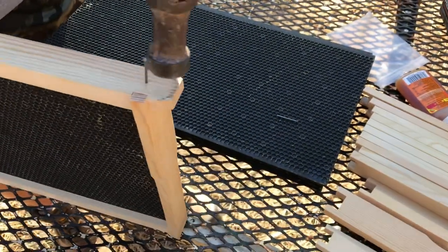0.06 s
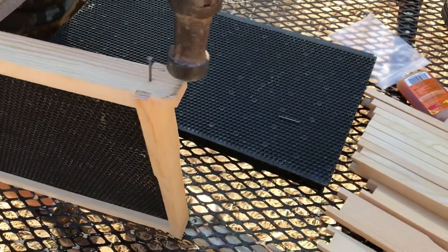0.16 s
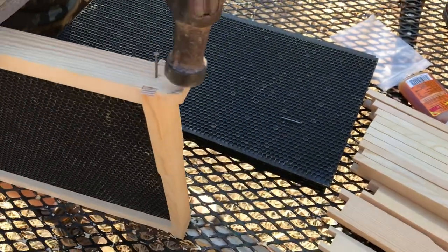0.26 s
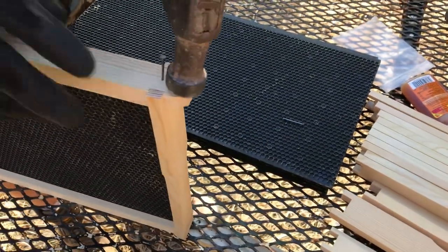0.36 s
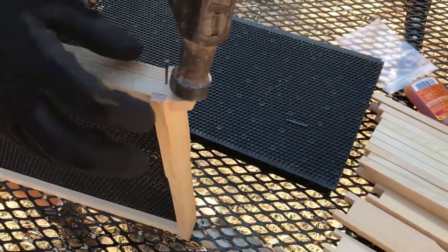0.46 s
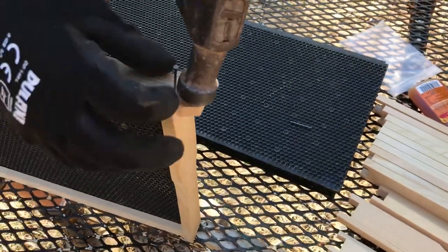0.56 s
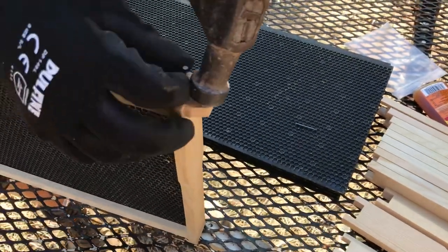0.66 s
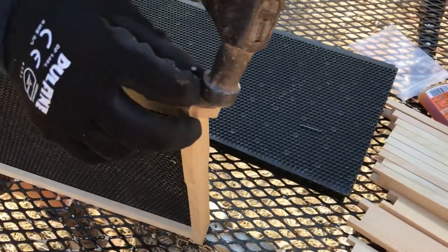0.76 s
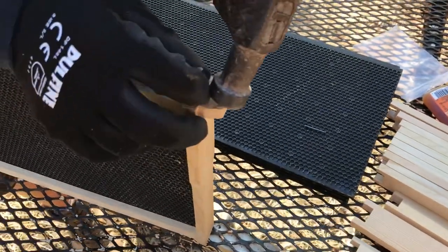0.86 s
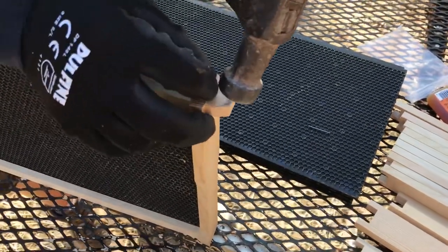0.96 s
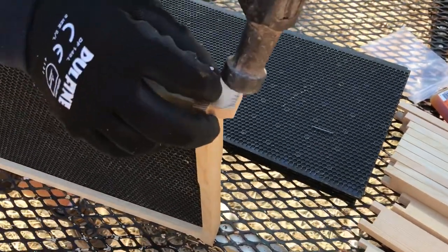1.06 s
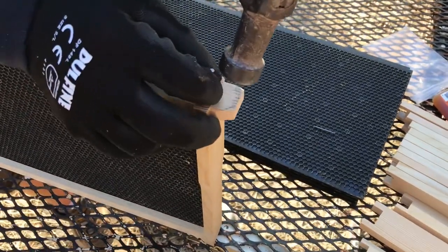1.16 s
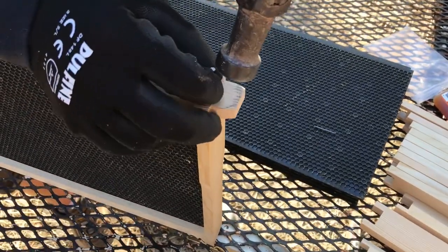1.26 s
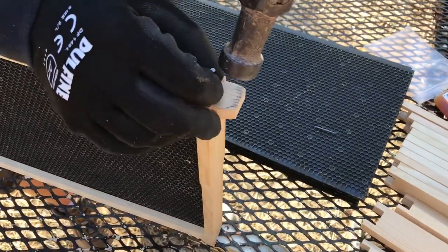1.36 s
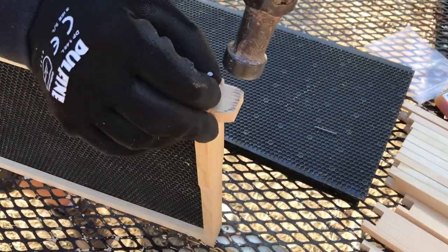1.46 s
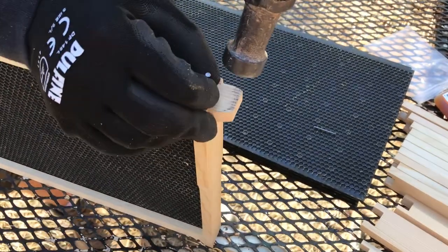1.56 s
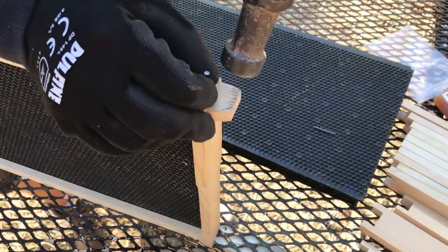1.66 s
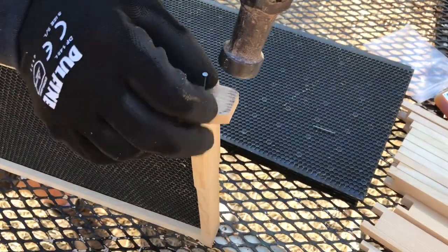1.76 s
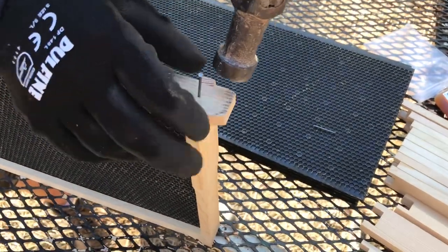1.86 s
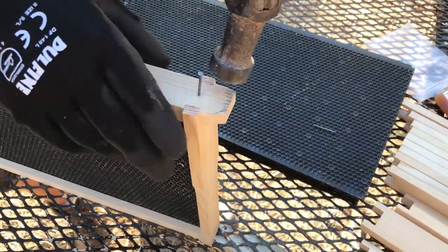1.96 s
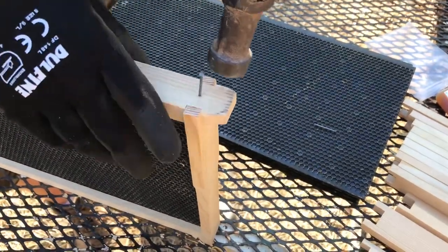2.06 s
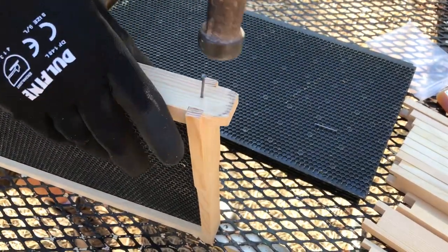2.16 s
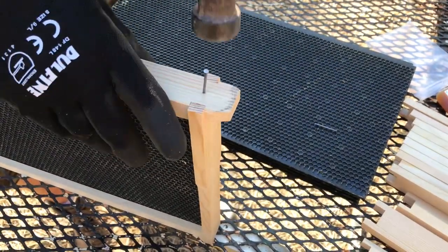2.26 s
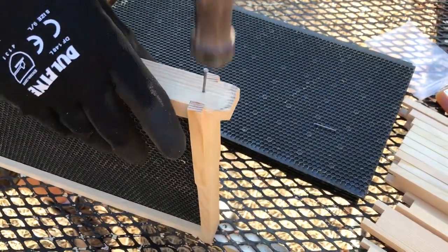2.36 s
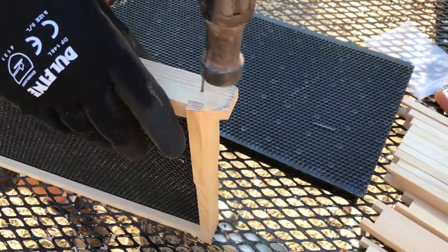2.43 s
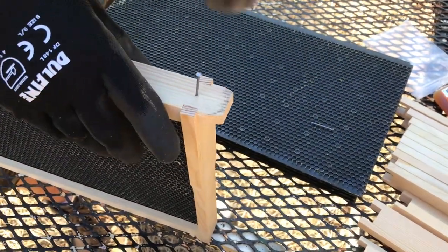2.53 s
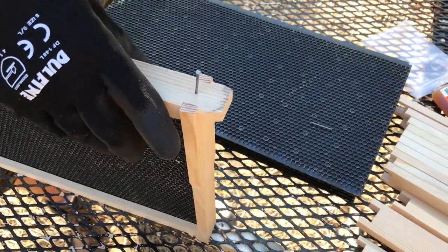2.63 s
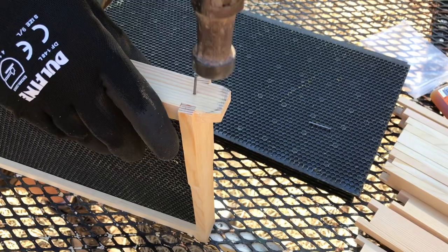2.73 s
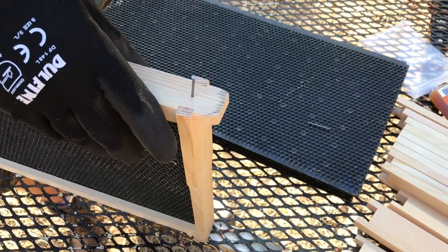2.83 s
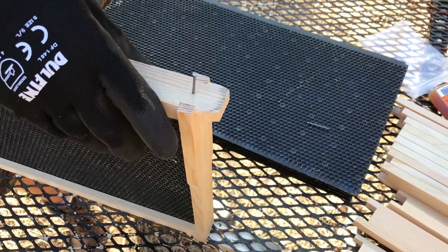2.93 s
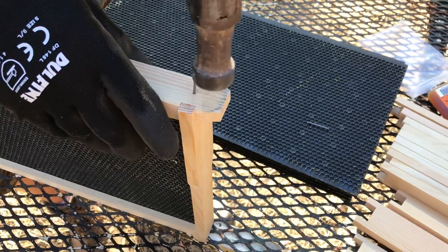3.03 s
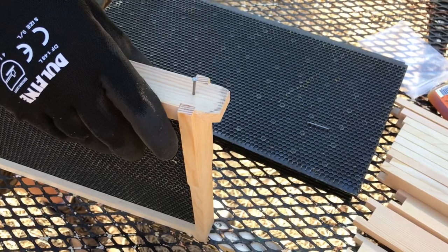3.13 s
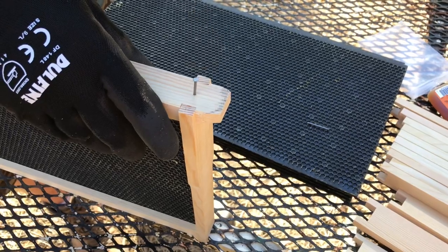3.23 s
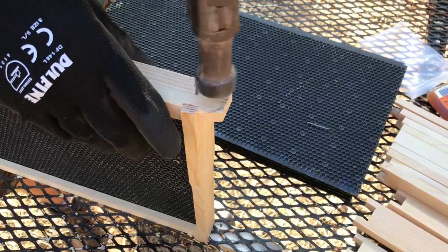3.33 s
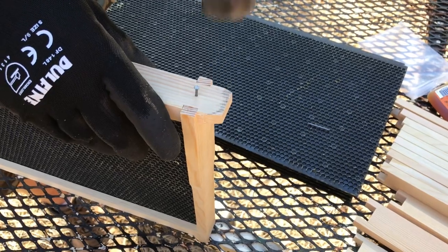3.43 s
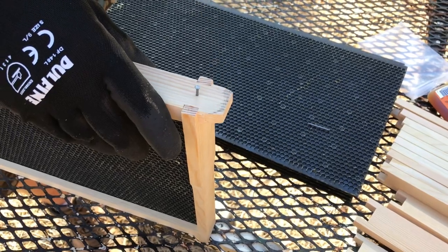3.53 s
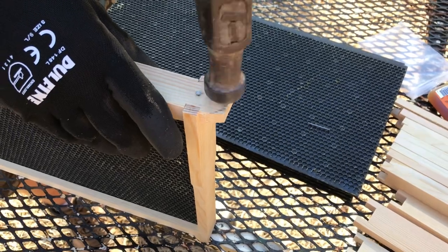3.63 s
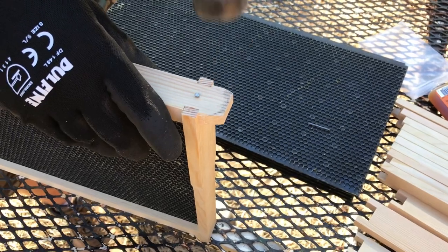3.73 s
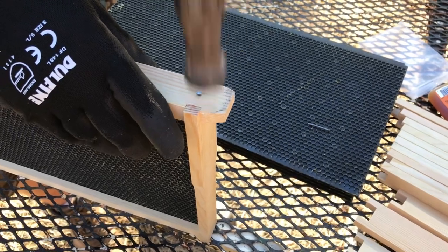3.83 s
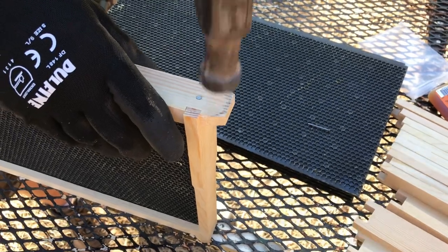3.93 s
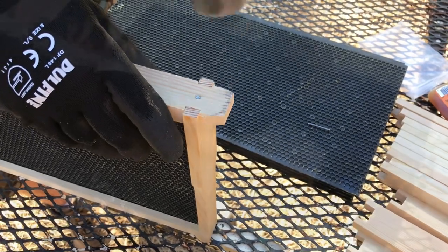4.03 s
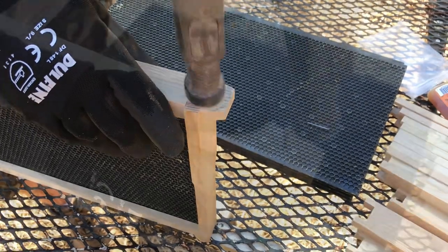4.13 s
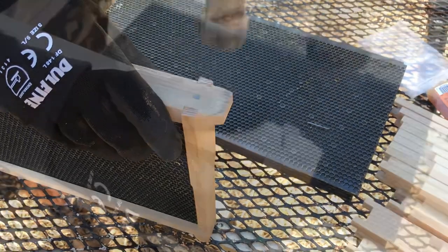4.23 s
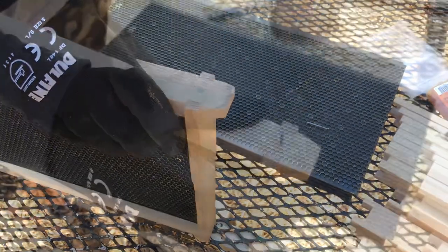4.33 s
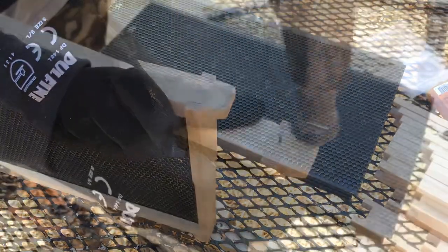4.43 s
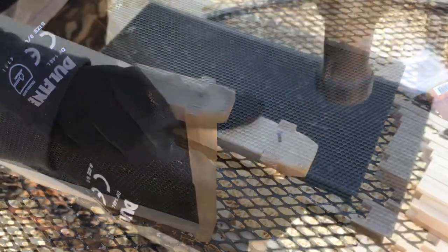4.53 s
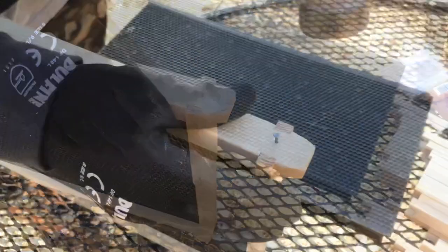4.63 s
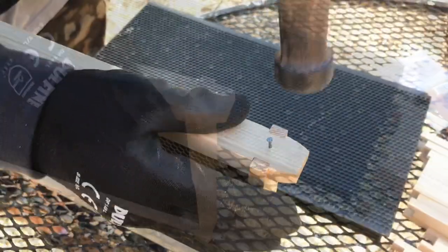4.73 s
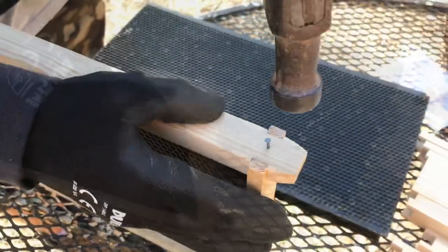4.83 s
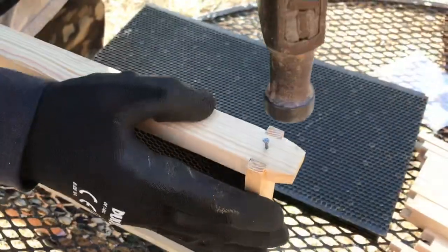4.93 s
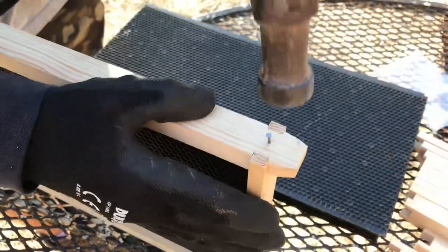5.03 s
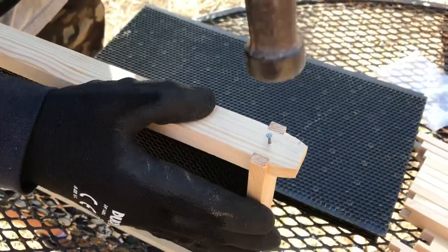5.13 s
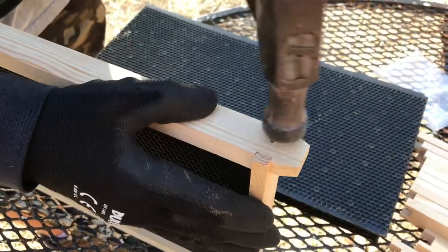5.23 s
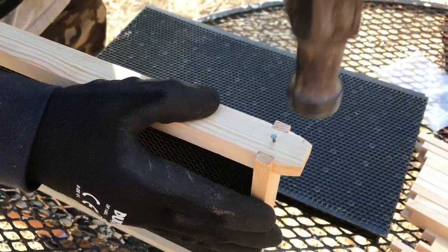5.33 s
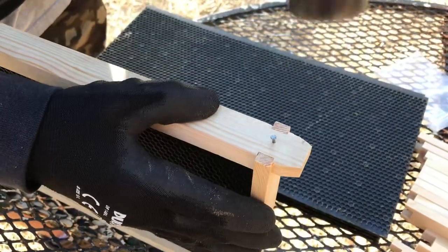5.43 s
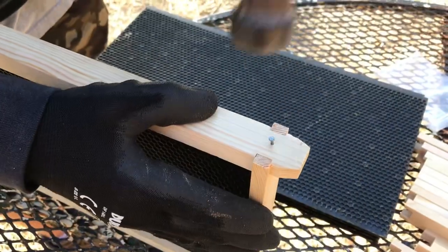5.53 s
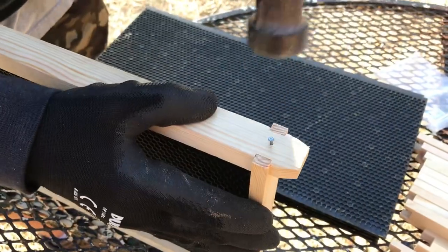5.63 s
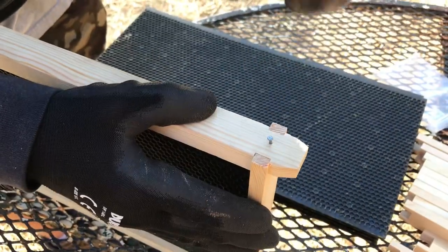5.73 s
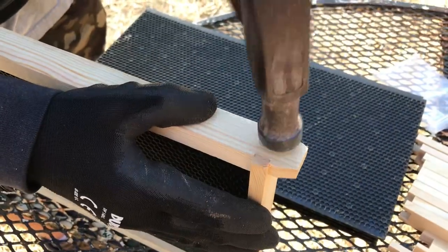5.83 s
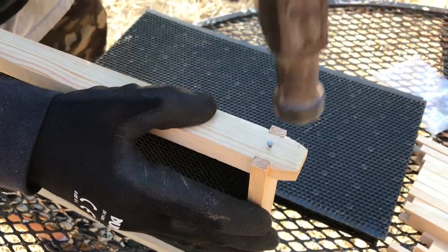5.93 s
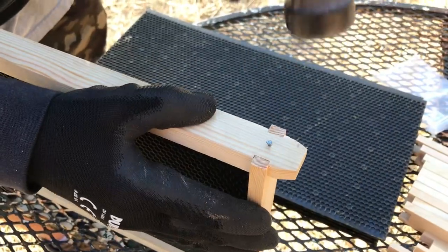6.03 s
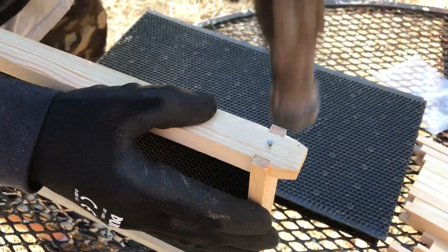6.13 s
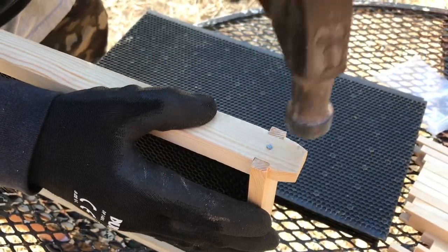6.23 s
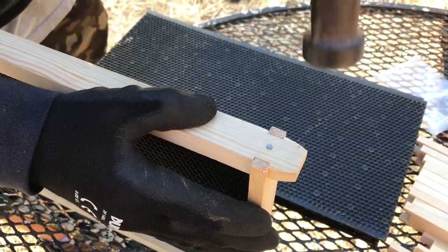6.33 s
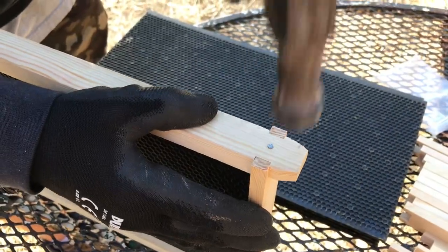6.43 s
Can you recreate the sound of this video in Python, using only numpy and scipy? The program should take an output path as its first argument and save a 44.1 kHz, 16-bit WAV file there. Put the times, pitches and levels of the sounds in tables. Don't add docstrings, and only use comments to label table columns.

```python
import sys
import numpy as np
from scipy import signal
from scipy.fft import rfft, irfft, next_fast_len
from scipy.io import wavfile
from scipy.ndimage import uniform_filter1d

SR = 44100
rng = np.random.default_rng(int(sys.argv[2]) if len(sys.argv) > 2 else 0)


def elevation(decibels):
    levels = np.asarray(decibels, float)
    return 10 ** (levels / 20)


def generate_wav(sig):
    pcm = np.round(np.clip(np.atleast_2d(sig).T, -1, 1) * 32767).astype(np.int16)
    wavfile.write(sys.argv[1], SR, pcm)


N = 285768
TURNED_S = 4.4


def noise(count):
    return rng.standard_normal(count)


def evened(x):
    return x / np.sqrt(np.mean(x ** 2) + 1e-20)


def add(mix, s, sound):
    part = mix[max(round(s * SR), 0):][:len(sound)]
    part += sound[:len(part)]


def coloured(x, points):
    size = next_fast_len(len(x))
    f, db = np.transpose(points)
    bins = np.log(np.fft.rfftfreq(size, 1 / SR) + 1)
    gain = elevation(np.interp(bins, np.log(f + 1), db))
    return irfft(rfft(x, size) * gain, size)[:len(x)]


def resonate(x, hz, width):
    return signal.lfilter(*signal.iirpeak(min(hz, .45 * SR), max(hz / width, .3), SR), x)


def low_part(x, hz):
    return signal.sosfilt(signal.butter(2, hz, fs=SR, output="sos"), x)


def wander(count, *sizes):
    x = noise(count)
    for size in sizes:
        x = uniform_filter1d(x, size)
    return evened(x)


def drift(per_s):
    return wander(N, int(SR / per_s), int(SR / per_s))


def ring(modes, t, widen=1):
    sound = np.zeros(len(t))
    for hz, width, db in modes:
        level_off, pitch_off, phase = rng.standard_normal(3)
        decay = np.exp(-np.pi * width * widen * t)
        swing = np.sin(2 * np.pi * hz * (1 + .012 * pitch_off) * t + phase)
        sound += elevation(db + 2 * level_off) * decay * swing
    return sound


def contact(db, hz, sharp):
    # f/Hz, level/dB per Hz
    scratch_colour = [(300, -22), (1500, -9), (3500, 0), (6000, -5), (10000, -13), (15000, -21),
                      (17000, -30)]
    t = np.arange(900) / SR
    sharp = np.clip(sharp, 0, 1)
    rise = t * hz / 2.0
    cycles = np.sin(2 * np.pi * hz * t) * rise * np.exp(1 - rise)
    burst = (t / .0022) ** 2 * np.exp(2 - 2 * t / .0022)
    scratch = evened(coloured(noise(len(t)), scratch_colour)) * burst
    return elevation(db + 3) * ((1 - sharp) * cycles + sharp * scratch)


def yard():
    # f/Hz, level/dB per Hz
    traffic = [(15, -35.5), (36, -2.5), (106, -4.5), (188, -14.5), (267, -15.5), (324, -19), (558, -22.5),
               (1020, -23), (1200, -22), (1660, -29), (3020, -33.5), (3460, -36), (10300, -44.5),
               (14300, -41), (16800, -49.5)]
    # f/Hz, width/Hz, level/dB
    whines = [
        (12940, 60, -82),
        (14400, 250, -79),
    ]
    sound = elevation(-54 + .6 * drift(2.0)) * evened(coloured(noise(N), traffic))
    for hz, width, db in whines:
        sound += elevation(db) * evened(resonate(noise(N), hz, width))
    return sound


def idling_motor():
    # multiple of the turning rate, level/dB
    idle_orders = [(2, -59), (3, -72.5), (4, -56), (5, -67.5), (6, -60), (7, -76), (8, -73)]
    idle_hz = 22.5
    turn = 2 * np.pi * np.cumsum(idle_hz * (1 + 0.03 * drift(3.3))) / SR
    return np.sqrt(2) * sum(elevation(db + 6.0 * drift(16)) * np.cos(k * turn) for k, db in idle_orders)


def rub(start, length, db, fizz_db, body_db):
    # f/Hz, width/Hz
    rub_bands = [
        (4260, 5700),
        (9300, 12500),
        (1700, 3060),
    ]
    t = np.arange(start, start + length, 1 / SR)
    slips = noise(len(t)) * elevation(2.2 * rng.exponential(1, len(t)))
    rasp, fizz, body = (evened(resonate(resonate(slips, *b), *b)) for b in rub_bands)
    pressure_db = np.interp((t - start) / length, [0, .29, .73, 1], [-3.5, 0, -4.5, -14])
    grip_db = 1.3 * wander(len(t), 500)
    sound = rasp + elevation(fizz_db) * fizz + elevation(body_db) * body
    return elevation(db + pressure_db + grip_db) * sound * signal.windows.tukey(len(t), .15)


def rubs(work):
    # start t/s, length t/s, level/dB, fizz level/dB, body level/dB
    strokes = [(0, 0.078, -65.5, 1, 14), (0.051, 0.22, -59, -3.5, 5.5), (0.37, 0.023, -56.5, -4, 4.5),
               (0.387, .06, -70, -9, 1), (0.452, 0.2, -70.5, 2, -2), (.63, 0.09, -62, -5, -1),
               (0.704, 0.22, -65, -4, -3), (1.774, .05, -56, -2, -16), (1.806, .07, -64, 1, -13),
               (1.853, 0.13, -62.5, 3, 7), (1.939, 0.17, -58.5, -2, -1), (2.105, .05, -65, -8, -4),
               (4.782, 0.2, -58.5, 7.5, -11), (5.0, 0.17, -65.5, -3, -2), (5.406, 0.094, -62.5, -3, -18),
               (5.497, 0.069, -66, 9, -9), (5.538, 0.063, -58, 1.5, -15)]
    for start, *settings in strokes:
        add(work, start, rub(start, *settings))


def rub_sing():
    size = int(.27 * SR)
    song = evened(resonate(noise(size), 4250, 220))
    return elevation(-60) * song * signal.windows.tukey(size, .4)


def bump(db, modes):
    t = np.arange(SR // 8) / SR
    grit = .7 * low_part(noise(len(t)), 2000) * np.exp(-t / .02)
    return elevation(db) * (ring(modes, t) + grit) * (1 - np.exp(-t / 0.00037))


def bumps(work):
    bump_s = [0, .3715, .386, .755, .404]
    bump_db = [-37, -32, -35.5, -42, -42.5]
    # f/Hz, width/Hz, level/dB
    bump_modes = [
        [(1656, 73, 3), (1880, 24, -2)],
        [(197, 57, -1), (340, 75, -3), (590, 26, -4), (890, 55, -9), (1480, 100, -6), (2240, 81, -19),
         (3200, 57, -15)],
        [(354, 25, -6), (590, 36, -4.5), (753, 35, -0.5), (1400, 99, -2), (1600, 49, -6)],
        [(470, 74, 2)],
        [(340, 36, 7.5), (636, 20, -1), (1000, 38, -1)],
    ]
    for s, db, modes in zip(bump_s, bump_db, bump_modes):
        add(work, s, bump(db, modes))


def touches(work):
    # t/s, peak level/dB, ring f/Hz, sharp share 0-1
    light_touches = [(0.6392, -60, 4450, 0.4), (0.6967, -50.5, 2060, 0.36), (0.8093, -55, 1850, 0.55),
                     (1.19, -58, 1520, 0.34), (1.5316, -42, 9400, 0.23), (1.5557, -35.5, 9600, 0.1),
                     (1.5794, -69, 1520, 1), (1.7833, -49, 3760, 0), (1.953, -44.5, 2060, 0.5),
                     (2.081, -50, 4260, 0.43), (3.5655, -48, 1720, 0.15), (4.6392, -63, 1600, 0.7),
                     (4.9597, -61.5, 1700, 0.55), (5.1388, -62, 1500, 0.66), (5.4124, -59, 5000, 0.7),
                     (5.5041, -61, 1540, 0.77), (5.5326, -45, 7320, 0.2), (5.5494, -44, 3610, 0.4),
                     (5.5762, -41.5, 8270, 0.33), (5.7185, -48.5, 5020, 0.4)]
    for s, *settings in light_touches:
        add(work, s, contact(*settings))


def far_engine():
    # t/s, firing f/Hz, level/dB
    revs = [
        (1.55, 69.3, -60),
        (1.811, 87.3, -46.5),
        (2.0, 96.4, -44),
        (2.599, 97, -40),
        (3.03, 105.3, -41),
        (3.12, 110.1, -45),
        (3.4, 113.9, -47.5),
        (4.402, 114.5, -56),
        (4.85, 119.7, -69),
    ]
    # multiple of the firing rate, level/dB
    engine_orders = [(.5, -19.5), (1, 3.5), (1.5, -13), (2, -18.5)]
    t = np.arange(N) / SR
    s, hz, db = np.transpose(revs)
    turn = 2 * np.pi * np.cumsum(np.interp(t, s, hz) * (1 + 0.0015 * drift(6))) / SR
    level_db = np.interp(t, s, db, left=-120, right=-120) + 2.0 * drift(26)
    return np.sqrt(2) * sum(elevation(level_db + d) * np.cos(k * turn) for k, d in engine_orders)


def steel_tick(t):
    # f/Hz, width/Hz, level/dB
    hammer_face = [(6950, 750, -2.5), (9700, 8700, -9), (13200, 3800, -13), (4130, 1200, -16.5)]
    # f/Hz, t60 t/s, level/dB under the tick
    head_ring = [(5665, .45, -63), (5700, .3, -66)]
    tick = ring(hammer_face, t) + .5 * noise(len(t)) * np.exp(-t / .0011)
    tick = tick / abs(tick).max()
    return tick + sum(elevation(db - 60 * t / t60) * np.sin(2 * np.pi * hz * t) for hz, t60, db in head_ring)


def wood_knock(t, wood):
    # f/Hz, width/Hz, level/dB
    thump = [(738, 110, -1), (1330, 620, -4)]
    knock = ring(wood, t, widen=3.0) + 1.8 * ring(thump, t)
    knock = knock * (1 - np.exp(-(t / 0.003) ** 2))
    return knock / np.std(knock[:400])


def mesh_chatter(t, wood, length, treble_db):
    # f/Hz, level/dB per Hz
    chatter_colour = [(35, -34), (60, 1.5), (366, -4), (464, -10), (586, -1), (1110, -2.5), (1650, -5.5),
                      (1810, -7), (2290, -6.5), (3580, -5.5), (4860, -9), (11000, -22), (15400, -32),
                      (16500, -34)]
    clump_db = np.minimum(1.5 + 25 * t, 3.5) * wander(len(t), 110, 70)
    grains = noise(len(t)) * elevation(0.35 * rng.exponential(1, len(t)))
    body = evened(coloured(grains, chatter_colour))
    woody = sum(elevation(db) * resonate(body, hz, 1.7 * width) for hz, width, db in wood)
    body = evened(body + 0.6 * woody)
    below = low_part(body, 2900)
    table = low_part(below, 720)
    age = t / max(length, .02)
    table_env = elevation(-32 * age) * (1 - np.exp(-t / .014))
    middle_env = elevation(-42 * age ** 1.295 + 0.77 * clump_db) * (1 - np.exp(-t / 0.004))
    treble_env = elevation(treble_db - 41.2 * (1.16 * age) ** 1.214 + clump_db) * (1 - np.exp(-t / 0.00047))
    chatter = table * table_env + (below - table) * middle_env + (body - below) * treble_env
    return chatter * signal.windows.tukey(2 * len(t), .2)[len(t):]


def blow(s, tick_db, knock_db, chatter_db, length):
    # f/Hz, width/Hz, level/dB
    frame_modes = [(348, 15, -5), (1140, 240, -8.5), (1390, 68, 2.5), (1550, 33, -1.5), (1818, 11, 3.5),
                   (2103, 4.2, -3), (2340, 39, -2), (3200, 31, -19), (3610, 150, -6), (4050, 45, -5)]
    # f/Hz, width/Hz, level/dB
    turned_modes = [(345, 110, -1.5), (930, 160, 1), (1050, 210, -4), (1500, 34, 2), (1604, 11, -7),
                    (1970, 19, -9.5), (2290, 30, -11.5), (3010, 47, -7), (3490, 51, -11), (4030, 45, -6),
                    (4220, 37, -2), (5230, 60, -21)]
    wood = frame_modes if s < TURNED_S else turned_modes
    t = np.arange(SR // 2) / SR
    sound = elevation(tick_db) * steel_tick(t) + elevation(knock_db - 7) * wood_knock(t, wood)
    treble_db = 5.5 + 0.4864 * knock_db
    add(sound, 0, elevation(chatter_db) * mesh_chatter(t[:SR // 4], wood, length, treble_db))
    return sound


def hops(work, s, chatter_db, count=3):
    for i in range(1, count + 1):
        age = .022 * (i + .15 * rng.uniform(-1, 1))
        add(work, s + age, contact(chatter_db - 9 - 210 * age, rng.uniform(2900, 4800), 1))


def hammering(work):
    # t/s, tick peak level/dB, knock level/dB, chatter level/dB, chatter length t/s
    blows = [(2.4294, 2.5, -16.5, -14, 0.15), (2.7280, 7.5, -15.5, -12.5, 0.14),
             (3.0230, 8, -15.5, -12, 0.14), (3.3294, 6, -20, -14, 0.15), (3.622, 7, -14, -14, .16),
             (3.8946, 2, -10.5, -8.5, 0.17), (4.1333, -15.5, -26.5, -23, .093),
             (4.1478, 0, -7.5, -10, 0.18), (4.4526, -1.5, -14.5, -20.5, .14), (5.2580, 6.5, -7, -14.5, .13),
             (5.8780, 5.5, -9, -15, .13), (6.2007, 5, -8.5, -14, .14)]
    rebounds = [-5.5, -4, -4, -11.5, -5.5, -2.5, -40, -25, -30, -7.5, -14, -9.5]
    for (s, tick_db, knock_db, chatter_db, length), rebound_db in zip(blows, rebounds):
        add(work, s, blow(s, tick_db, knock_db, chatter_db, length))
        rebound_hz = 3660 if s < TURNED_S else 4230
        add(work, s + .0088, contact(rebound_db, rebound_hz, .15))
        hops(work, s, chatter_db)


def bounces(work):
    # t/s, level/dB, ring f/Hz
    drops = [(2.4933, -29.5, 5370), (2.5298, -46, 2950), (2.7566, -9.5, 3610), (2.798, -32, 4570),
             (2.8185, -42, 2840), (2.8443, -44.5, 4050), (3.088, -39, 4350), (3.1382, -40.5, 4100),
             (3.3558, -16, 4220), (3.378, -26, 4430), (3.4447, -49.5, 3840), (3.655, -33, 3670),
             (3.6883, -24, 3010), (3.7409, -45.5, 2980), (3.9943, -27.5, 4000), (4.0207, -36.5, 4280),
             (4.0593, -63, 3790), (4.1741, -16, 3470), (4.2345, -26, 4820), (4.2748, -38, 5340),
             (4.3213, -52.5, 4570), (4.5202, -37.5, 3100), (4.556, -51.5, 3720), (5.2873, -12.5, 3130),
             (5.352, -44, 6070), (5.9453, -36.5, 4130), (5.9807, -50, 3960), (6.228, -13, 3050),
             (6.2971, -33.5, 4400), (6.3364, -52, 3010)]
    for s, db, hz in drops:
        add(work, s, contact(db, hz, min(.25 - .04 * (db + 13.5), .85)))


def chirp():
    length_s, from_hz, to_hz = .012, 2500, 5800
    t = np.arange(0, length_s, 1 / SR)
    share = t / length_s
    hz = from_hz + (to_hz - from_hz) * share ** 1.5
    return elevation(-48 - 6 * share) * np.sin(np.pi * share) * np.sin(2 * np.pi * np.cumsum(hz) / SR)


def zipper():
    # t/s, cell rate f/Hz, level/dB
    finger_run = [
        (5.660, 445, -60),
        (5.664, 435, -49),
        (5.676, 424, -42),
        (5.686, 465, -46),
        (5.695, 495, -43),
        (5.706, 480, -46),
        (5.713, 430, -50),
        (5.721, 330, -51),
    ]
    # f/Hz, width/Hz, level/dB
    panel_modes = [(437, 89, -16), (960, 480, -8), (3220, 470, -8.5), (5000, 900, -16), (7800, 1300, -9),
                   (12000, 6400, 0.5)]
    s, per_s, db = np.transpose(finger_run)
    t = np.arange(s[0], s[-1], 1 / SR)
    cells = np.cumsum(np.interp(t, s, per_s) * (1 + .017 * wander(len(t), 60))) / SR
    clicks = evened(sum(np.cos(2 * np.pi * k * cells) * .9 ** k for k in range(1, 30)))
    clicks += .22 * np.diff(noise(len(t) + 1)) * (.5 + np.exp(-(cells % 1) / .3))
    panel = sum(elevation(d) * resonate(clicks, hz, width) for hz, width, d in panel_modes)
    return s[0], elevation(np.interp(t, s, db)) * evened(panel)


def scene():
    work = yard() + idling_motor()
    rubs(work)
    add(work, 0, rub_sing())
    bumps(work)
    touches(work)
    work += far_engine()
    hammering(work)
    bounces(work)
    add(work, 5.424, chirp())
    add(work, *zipper())
    return work[None]


def low_pass(x):
    return signal.sosfilt(signal.butter(12, 17110, fs=SR, output="sos"), x)


def record(dry):
    x = signal.sosfilt(signal.butter(4, 40, "high", fs=SR, output="sos"), dry)
    now = uniform_filter1d(x ** 2, size=88) + 1e-12
    before = np.roll(uniform_filter1d(x ** 2, size=300), 230, axis=1)
    attack = x * np.clip(1 - 1.7 * before / now, 0, 1)
    x = x + elevation(-42) * np.roll(attack, -1024, axis=1) + elevation(-49) * np.roll(attack, -512, axis=1)
    x = .9 * np.tanh(x)
    edge = signal.firwin(601, 15900, fs=SR)[None]
    attack_edge = signal.firwin(601, 16800, fs=SR)[None]
    passed = elevation(-16) * attack
    mix = signal.oaconvolve(x - passed, edge, "same") + signal.oaconvolve(passed, attack_edge, "same")
    return low_pass(mix)


dry = scene()
out = record(dry)
generate_wav(out)
```